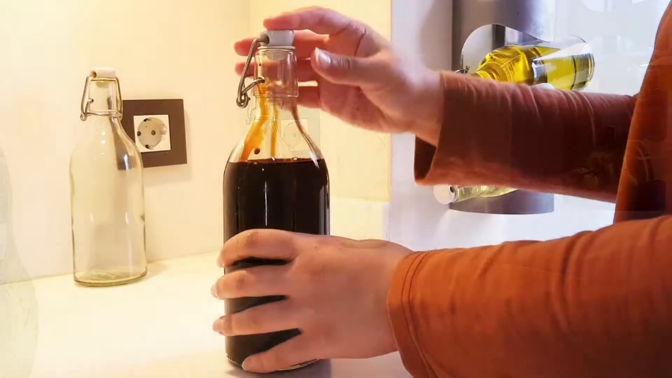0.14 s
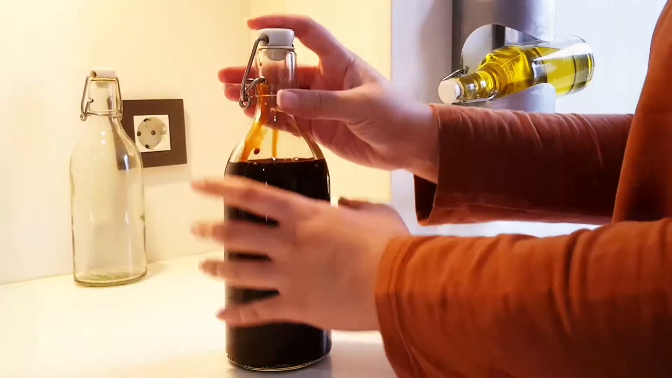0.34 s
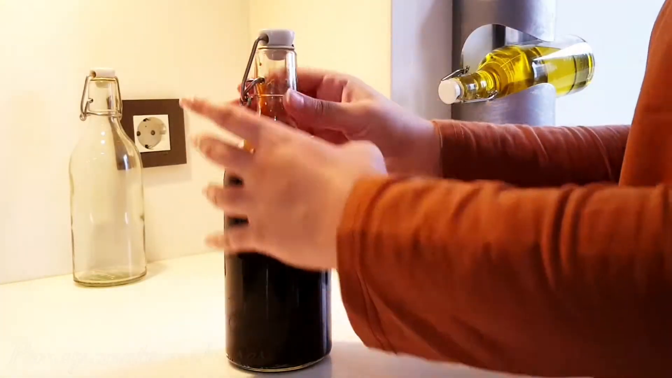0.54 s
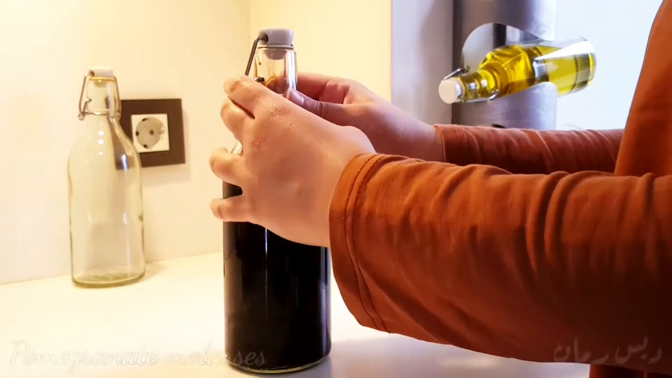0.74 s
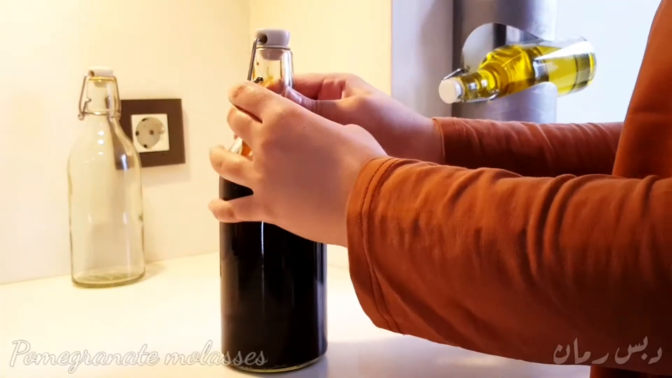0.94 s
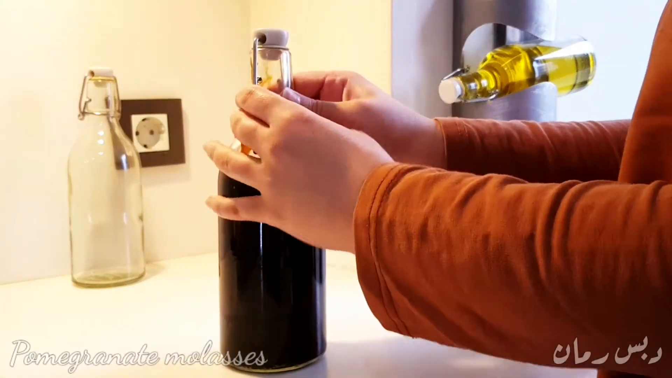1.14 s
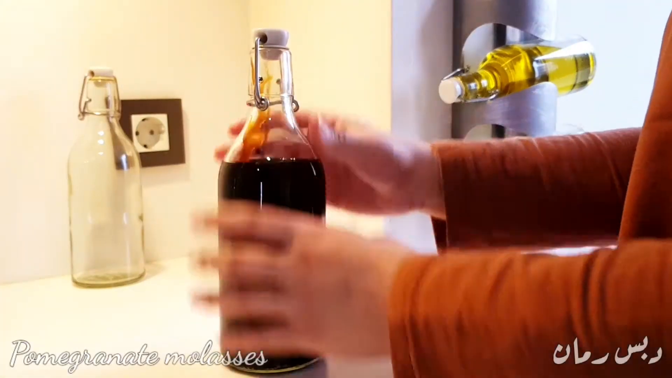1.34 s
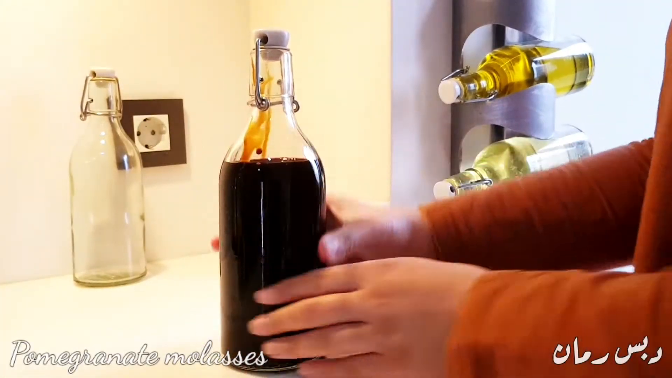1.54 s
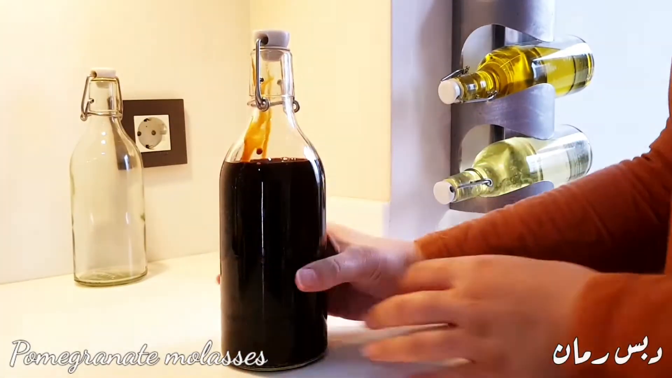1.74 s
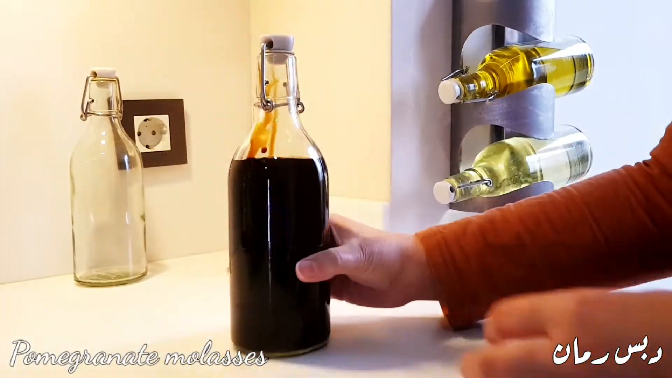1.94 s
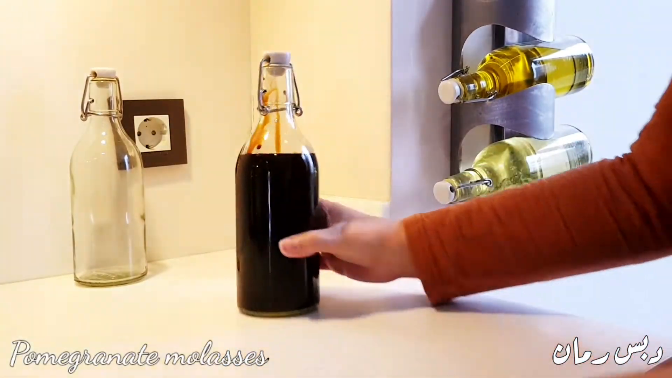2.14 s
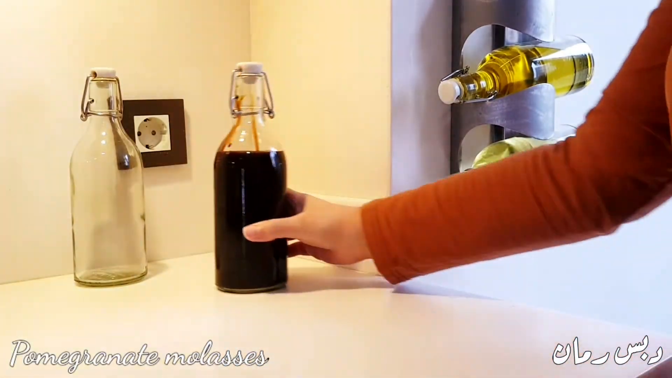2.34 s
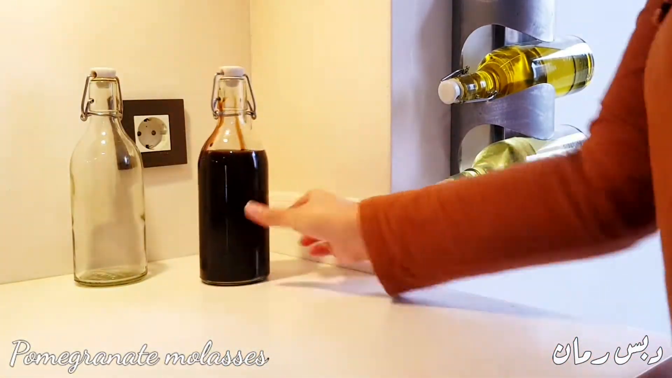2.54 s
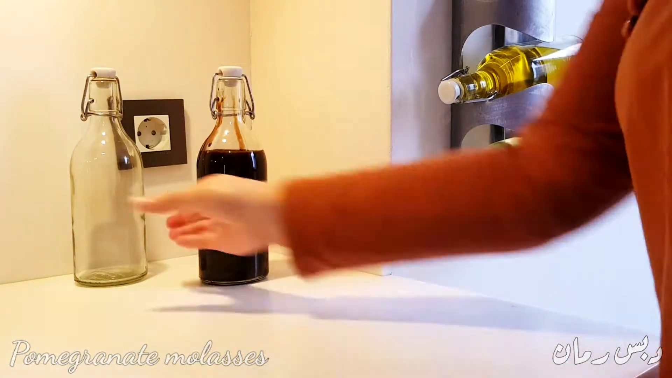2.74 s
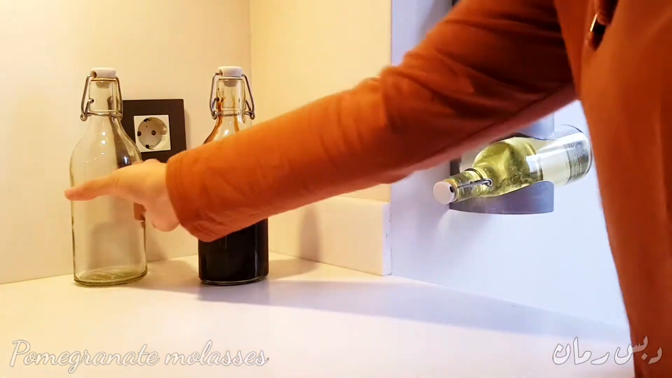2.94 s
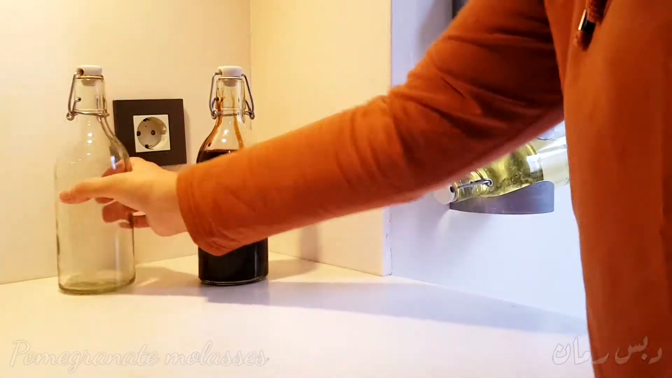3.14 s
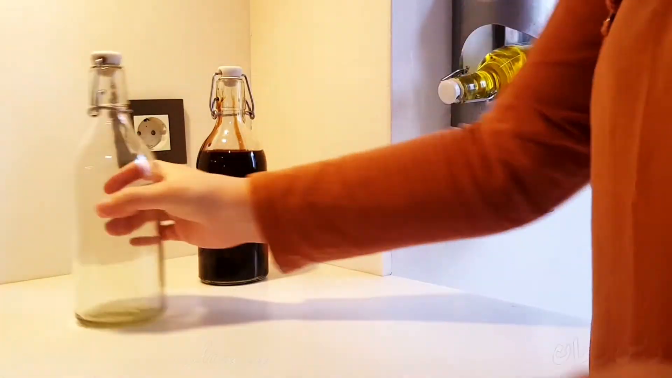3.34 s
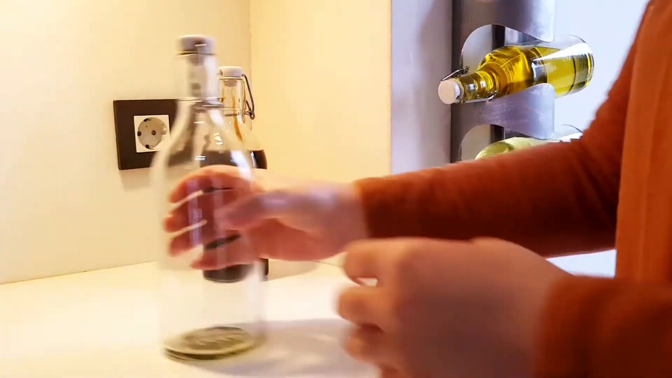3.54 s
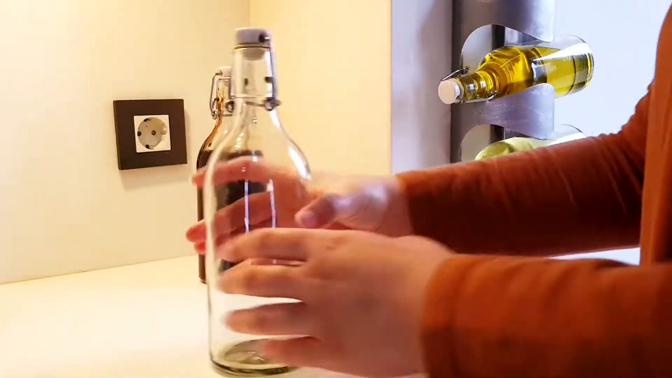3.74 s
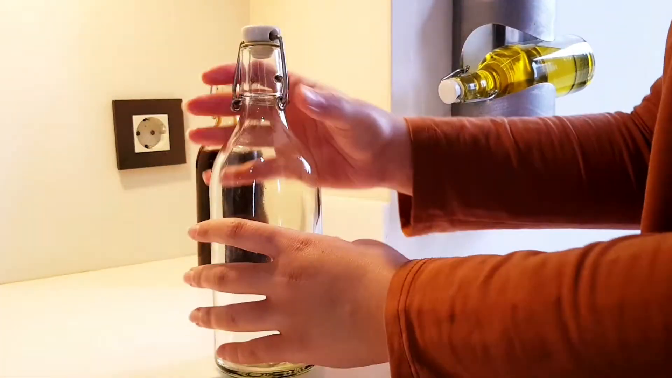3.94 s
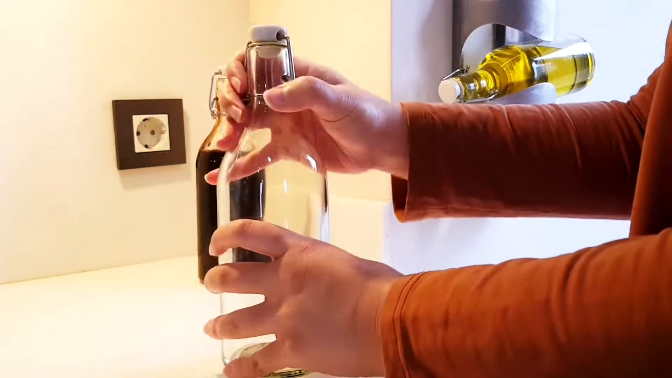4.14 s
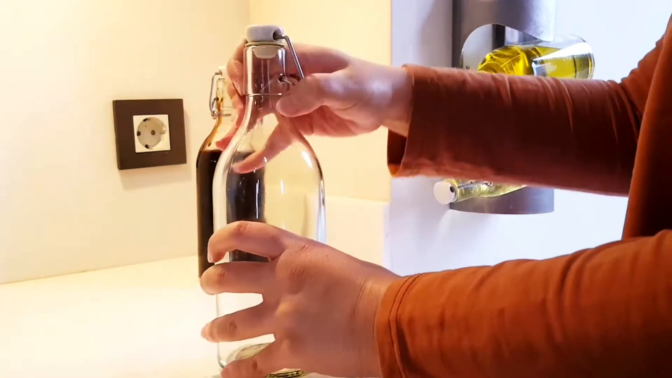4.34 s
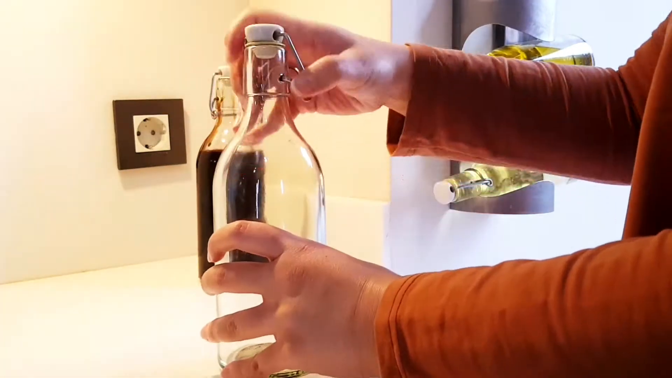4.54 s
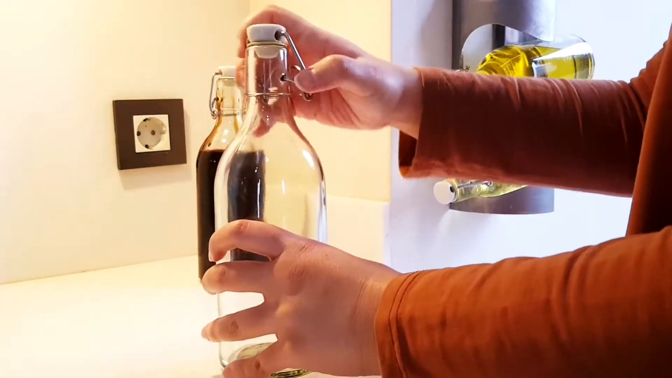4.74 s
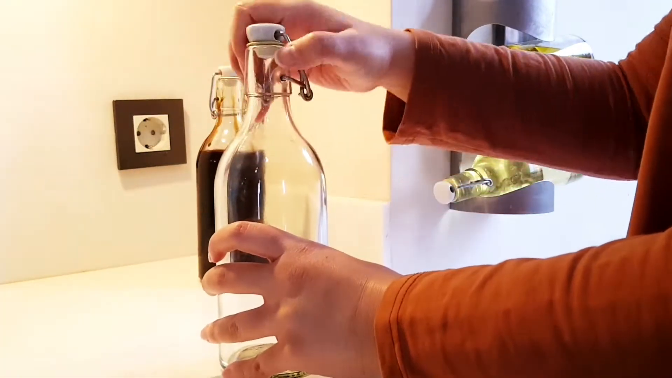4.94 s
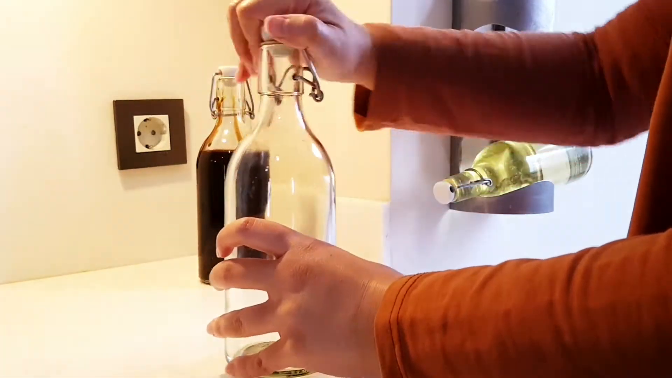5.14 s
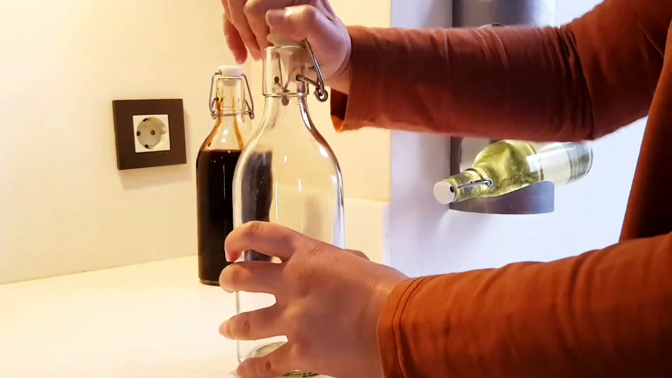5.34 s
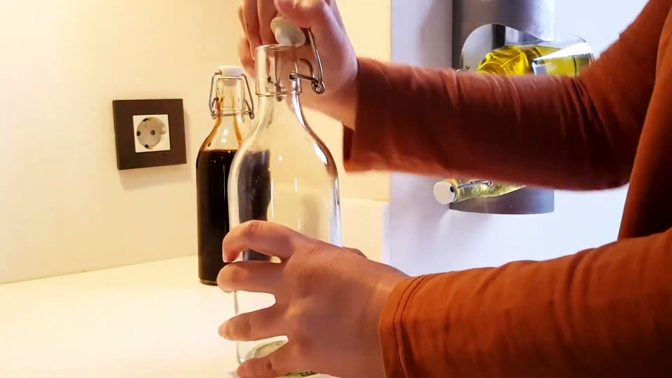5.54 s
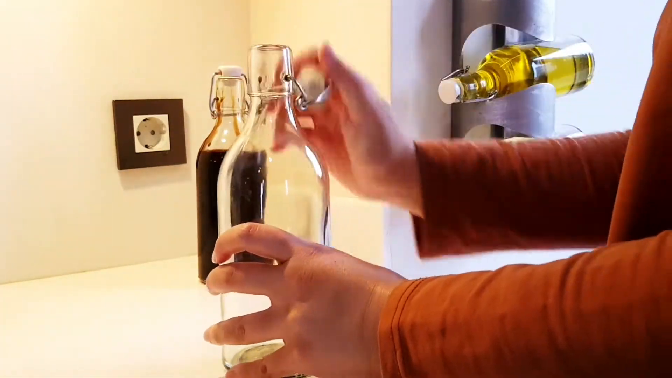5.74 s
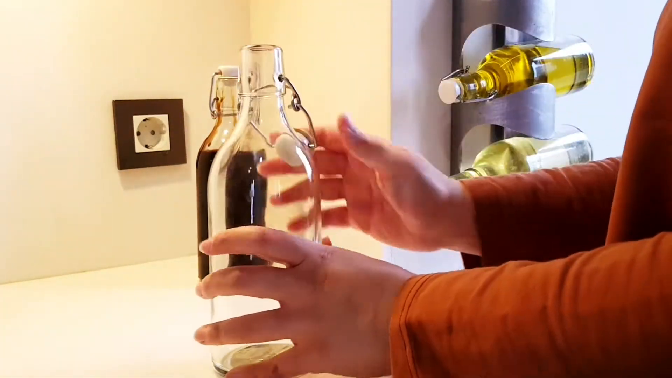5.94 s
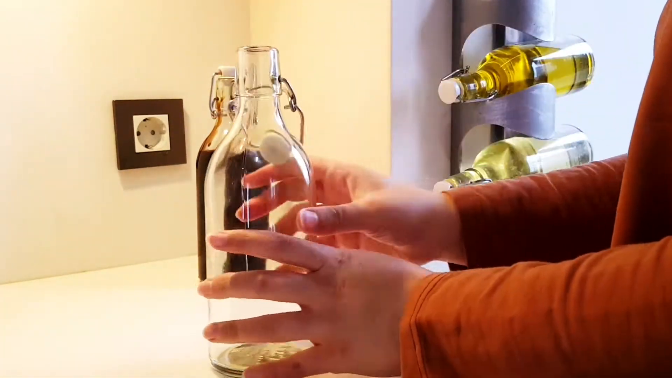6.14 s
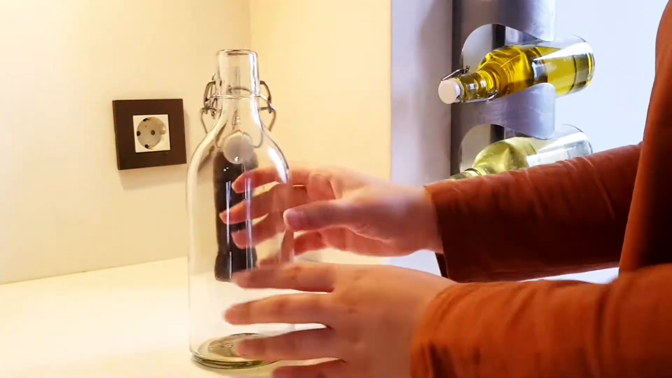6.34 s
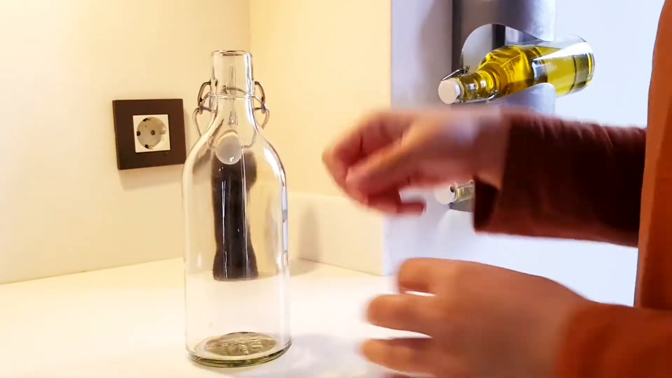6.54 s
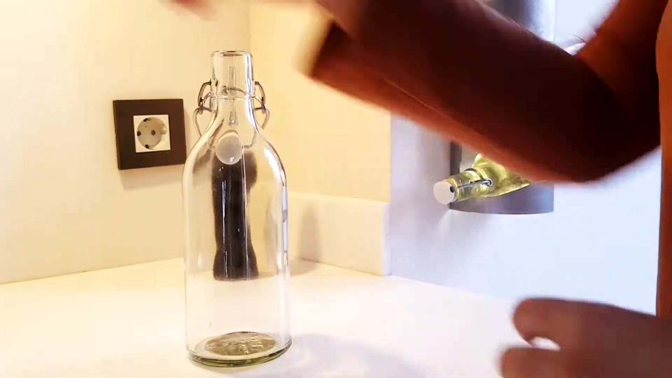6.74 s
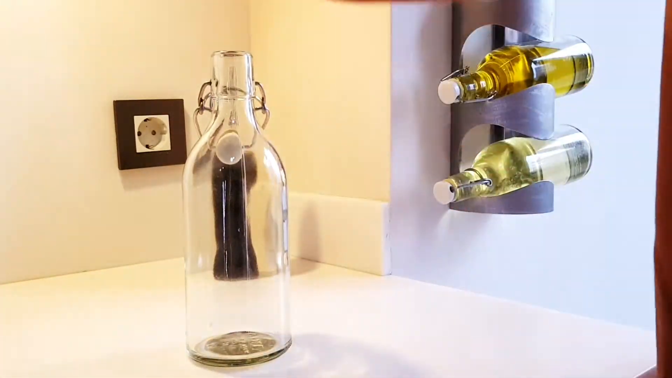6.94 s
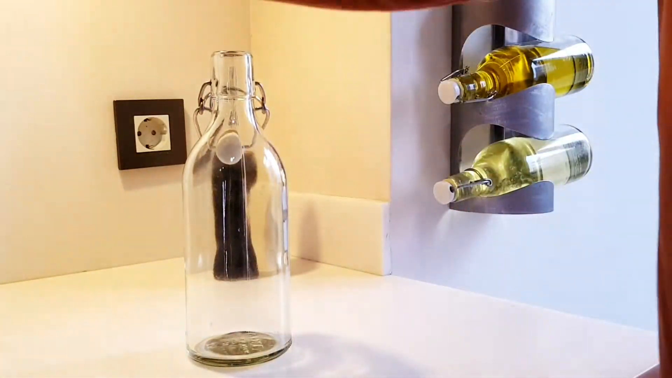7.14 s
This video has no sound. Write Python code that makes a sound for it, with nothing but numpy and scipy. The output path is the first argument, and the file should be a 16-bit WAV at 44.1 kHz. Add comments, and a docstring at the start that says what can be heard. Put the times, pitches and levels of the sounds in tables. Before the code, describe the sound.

Glass bottles with wire stoppers are worked by hand on a kitchen counter, heard close with short room reverberation. Nearly silent at first, then a sudden sharp clasp snap, a dry rough slide, the loudest cluster of woody knocks and another slide. Lighter bumps and small metallic glass clicks come irregularly, then a faint drag and quiet hum with thin hiss.

```python
"""Swing-top glass bottles are clamped, slid, rocked and set down on a hard kitchen counter.
Faint clicks of the wire clasp come first, then a hard knock with sharp clicks and a slide of a full bottle.
A burst of knocks near 3 s leads into a slide of an empty one; knocks and clicks follow, then a last slide.
Knocks are short pulses over decaying worktop modes, clicks are impulses spread over milliseconds with
decaying glass modes added, slides are resonant noise; a small tiled room answers over hum and treble noise."""
import sys
import numpy as np
from scipy import signal
from scipy.fft import irfft
from scipy.io import wavfile
from scipy.ndimage import uniform_filter1d

SR = 44100
rng = np.random.default_rng(int(sys.argv[2]) if len(sys.argv) > 2 else 0)


def dump(signal):
    """Clip the signal to [-1, 1] and save it as 16-bit WAV at the path in sys.argv[1]."""
    limited = np.clip(np.atleast_2d(signal).T, -1, 1)
    pcm = np.round(limited * 32767).astype(np.int16)
    wavfile.write(sys.argv[1], SR, pcm)


N = 320607

# modes of the worktop and cabinet: hz, relative level_db, t60_s
WORKTOP_MODES = [(81, -2, .3), (125, 3.5, 0.16), (146, -1.5, 0.13), (187.3, -3.5, 0.096), (212, -7, 0.099),
                 (248.4, -3, 0.11), (290.7, -0.5, .13), (354.6, 4, 0.079), (407.4, -1, 0.052),
                 (528.6, 3, 0.069), (612.5, -11, 0.23), (734, -33, .06), (867, -10, 0.053), (886, -7, 0.15),
                 (989, -21, .05), (1121, -2, 0.029), (1328, 0, 0.026), (1523, 6, 0.021), (1880, -3, 0.036)]
# modes of empty glass and wire, with a close pair that beats: hz, struck_db, rubbed_db, t60_s
GLASS_MODES = [(2710, -3, -40, .05), (3715, -2, 1, .2), (3763, -1, 1, .4), (5750, 0, -30, .14),
               (6250, -14, -14, .15), (8120, -3, -16, .08), (8460, -6, -20, .12), (9180, -20, -13, .2),
               (10000, -8, -22, .1), (12400, -6, -30, .07), (13480, -20, -5, .1), (13980, -20, -3, .12),
               (15200, 0, -30, .07)]


def gain_of(db):
    """Level to amplitude: 20 dB is a factor of ten."""
    return 10 ** (np.asarray(db) / 20)


def evened(x):
    """Normalization: scales a signal or field to rms 1."""
    return x / np.sqrt(np.mean(x ** 2) + 1e-20)


def read(points, hz):
    """Spectral interpolation: reads a table along a logarithmic frequency axis."""
    point_hz, value = np.transpose(points)
    return np.interp(np.log(hz + 1), np.log(point_hz + 1), value)


def add(mix, start_s, sound, pan_db=0):
    """Level-difference stereo: adds a sound, pan_db stronger on the left."""
    part = mix[:, round(start_s * SR):][:, :sound.shape[-1]]
    sides = gain_of([[pan_db / 2], [-pan_db / 2]])
    part += (sound * sides)[:, :part.shape[1]]


def noise(length, shape, size=512, likeness=None):
    """Partly coherent stereo noise; shape(hz, s) gives each cell's gain, likeness a floor of coherence."""
    # left-right likeness of diffuse sound, highest in the bass: hz, correlation
    diffuse_likeness = [(60, 0.94), (130, 0.99), (290, 0.92), (640, 0.47), (1410, -0.25), (3100, 0.24),
                        (6820, -0.21), (15000, -0.03)]
    hop = size // 4
    frames, hz = length // hop + 5, np.fft.rfftfreq(size, 1 / SR)
    a, b, c, d = rng.standard_normal((frames, len(hz), 4)).T
    same = read(diffuse_likeness, hz)
    if likeness is not None:
        same = np.maximum(likeness, same)
    same = np.clip(same, -1, 1)[:, None]
    left, other = a + 1j * b, c + 1j * d
    right = same * left + np.sqrt(1 - same ** 2) * other
    cells = np.array([left, right]) * shape(hz[:, None], np.arange(frames) * hop / SR)
    return signal.istft(cells, nperseg=size, noverlap=size - hop)[1][:, :length]


def peaks(table, hz):
    """Resonance: adds the power responses of modes given as hz, width_hz, level_db."""
    return np.sqrt(sum(gain_of(db) ** 2 / (1 + (2 * (hz - f) / width) ** 2) for f, width, db in table))


def patches(hz, s, db, tall=6, wide=12):
    """Random modulation: level blotches of rms db, smoothed over tall bins and wide frames."""
    field = rng.standard_normal((len(s), len(hz))).T
    field = uniform_filter1d(field, int(tall), 0)
    field = uniform_filter1d(field, int(wide), 1)
    return gain_of(db * evened(field))


def knock(tap_db, hz, ring_db, weight_db, thud_db, front):
    """Impact: a base gives a tap of a few cycles and excites the modes of the worktop."""
    # opposite-sign answer to taps at the front: delay_s, level_db
    rebound = (0.001687, -7)
    rebound_s, rebound_db = rebound
    t = np.arange(SR // 2) / SR
    # the crisp edge is weaker in duller taps: -18 dB at 1 kHz, 7 dB per octave of tap pitch
    crisp_db = tap_db - 18 + 7 * np.log2(hz / 1e3)
    tap = pulse(t, tap_db, hz, 0.18) + pulse(t, crisp_db, 2540, 0.47)
    if front:
        tap = tap - gain_of(rebound_db) * np.roll(tap, round(rebound_s * SR))
    return tap + thump(1.38 * hz, ring_db, weight_db, thud_db, 0.0011)


def pulse(t, db, hz, cycles):
    """Damped oscillation: a sine under a cubic rise and an exponential decay."""
    u = t * hz / cycles
    envelope = (u / 3) ** 3 * np.exp(3 - u)  # reaches 1 at u = 3
    return gain_of(db) * envelope * np.sin(2 * np.pi * hz * t)


def thump(top_hz, ring_db, weight_db, thud_db, rise_s):
    """Modal excitation: the struck spot sets each worktop mode's level, here drawn by chance."""
    t = np.arange(SR // 2) / SR
    f, mode_db, t60 = np.transpose(WORKTOP_MODES)[:, :, None]
    spot_db = 3 * rng.standard_normal(f.shape)
    phase = 2 * np.pi * rng.random(f.shape)
    blow_db = np.select([f < 100, f < 180], [thud_db, weight_db], ring_db)
    blow_db = blow_db - 10 * np.log10(1 + (f / top_hz) ** 4)  # soft blows miss high modes
    decay = gain_of(mode_db + spot_db + blow_db - 60 * t / t60)
    modes = decay * np.sin(2 * np.pi * f * t + phase)
    return modes.sum(0) * (1 - np.exp(-t / rise_s)) ** 2


def click(db, hz, rattle_s, ring_db):
    """Dispersion: random delay of each frequency band spreads a click into a rattle; glass modes are added."""
    t = np.arange(SR // 2) / SR
    bins = np.fft.rfftfreq(len(t), 1 / SR)
    width_hz = 1300 + 0.53 * hz  # higher clicks are broader
    chance = rng.exponential(1, 2000)
    delay_s = .0005 + rattle_s * np.interp(bins * 2 * rattle_s, np.arange(2000), chance)
    phase = -2 * np.pi * np.cumsum(delay_s) * bins[1]  # phase is the running sum of delay
    burst = irfft(np.exp(1j * phase) / (1 + ((bins - hz) / width_hz) ** 4), len(t))
    burst[SR // 4:] = 0
    burst *= .5 * np.sqrt(rattle_s * SR / 2) / np.linalg.norm(burst)
    f, struck_db, _, t60 = np.transpose(GLASS_MODES)[:, :, None]
    near_db = -30 * abs(np.log2(f / hz))  # modes near the loudest band are struck hardest
    ring = gain_of(struck_db + near_db + ring_db - 60 * t / t60) * np.sin(2 * np.pi * f * t)
    return gain_of(db) * burst, gain_of(db) * ring.sum(0)


def slide(rise_s, glide_s, fall_s, left, scrape_db, grit_db, rumble_db, rubbed_db, body):
    """Friction: noise that grows as a power of speed shakes the bottle, worktop and glass modes."""
    # spectrum of the grit: hz, level_db per Hz
    grit_spectrum = [(880, -31), (1500, -1), (2150, -10), (2420, -9), (4230, -24.5), (5560, -32),
                     (11100, -51), (15500, -58)]
    t = np.arange(0, rise_s + glide_s + fall_s, 1 / SR)
    speed = np.interp(t, np.cumsum([0, rise_s, glide_s, fall_s]), [0, 1, left, 0])
    scrape_gain = gain_of(scrape_db) * speed ** 1.15
    grit_gain = gain_of(grit_db) * speed ** 1.94
    rumble_gain = gain_of(rumble_db) * speed ** 0.42
    top = [(f, 1.26 / t60, db) for f, db, t60 in WORKTOP_MODES if f < 500]  # fast decay, broad peak
    glass = [(f, f / 70, db) for f, _, db, _ in GLASS_MODES]

    def scrape_shape(hz, s):
        return peaks(body, hz) * patches(hz, s, 3.2, 4.1, 11)

    def grit_shape(hz, s):
        return gain_of(read(grit_spectrum, hz)) * (hz > 2500) * patches(hz, s, 4.0)

    def rumble_shape(hz, s):
        return peaks(top, hz) * patches(hz, s, 6.1, 2.8, 4.1)

    def glass_shape(hz, s):
        return peaks(glass, hz) ** 2 * patches(hz, s, 3.5, 30, 4.6)

    scrape = scrape_gain * evened(noise(len(t), scrape_shape, 1024, 0.35))
    grit = grit_gain * evened(noise(len(t), grit_shape, 256, 0.14))
    rumble = rumble_gain * evened(noise(len(t), rumble_shape, 2048))
    rubbed = grit_gain * gain_of(rubbed_db) * evened(noise(len(t), glass_shape, 2048, 0.95))
    return scrape + grit + rumble + rubbed


def room(x):
    """Reverberation: single echoes join a dense decaying tail; three tails take turns so hits differ."""
    # decay time of the room: hz, t60_s
    decay_time = [(60, 0.94), (125, 0.8), (300, .43), (700, 0.57), (1500, 0.47), (3000, 0.48), (6000, 0.5),
                  (11000, 0.37)]
    # colour of the tail: hz, level_db
    tail_colour = [(60, -7.5), (250, 1.5), (1000, 0), (3000, 5), (8000, 4), (14000, 4.5)]
    # echoes of tiles and cupboards: delay_s, level_db
    echoes = [(.0034, -14), (.0052, -13), (.0075, -13), (.012, -15), (.019, -16), (.027, -17)]

    def tail_shape(hz, s):
        return gain_of(read(tail_colour, hz) - 60 * s / read(decay_time, hz))

    out = np.zeros((2, N))
    turn = np.arange(N) / SR * 9 % 3  # nine turns a second
    for k in range(3):
        tail = noise(SR, tail_shape, 256)
        tail *= 1 - np.exp(-np.arange(SR) / SR / .009)
        tail *= gain_of(-0.5) / np.linalg.norm(tail[0])
        for delay_s, db in echoes:
            spots = round(delay_s * SR) + rng.integers(-5, 6, 2)
            tail[[0, 1], spots] += gain_of(db) * rng.choice([-1, 1])
        distance = abs((turn - k + 1.5) % 3 - 1.5)
        share = np.cos(np.pi / 2 * np.clip(distance, 0, 1))  # equal-power crossfade
        out += signal.fftconvolve((x * share)[None], tail, axes=1)[:, :N]
    return out


def background():
    """Modulated noise: a lumpy low hum of the house, a thin hiss and soft swells of treble noise."""
    # drift of the background, which fades in: time_s, hum_db, hiss_db
    drift = [(0, -52, -87), (.15, -49, -71), (.9, -41, -70.5), (1.42, -47, -72), (1.8, -45, -78),
             (2.7, -45, -70.5), (2.95, -44.5, -65.5), (3.85, -44, -63.5), (4.05, -45, -71.5),
             (4.6, -46, -73.5), (5.25, -44, -72.5), (6.0, -40.5, -68), (6.45, -44, -71.5),
             (6.9, -43.5, -65.5), (7.27, -43.5, -71)]
    # soft swells of treble noise: middle_s, half_length_s, level_db
    swells = [(.1, .2, -75.5), (1.66, 0.23, -66.5), (3.834, 0.18, -70), (4.5, 0.094, -82),
              (5.506, 0.17, -71), (6.606, 0.25, -63.5), (7.053, .12, -75)]
    # spectra of house hum, microphone hiss and treble swells: hz, level_db per Hz
    hum_spectrum = [(12, -53.5), (20, -14), (51, -4), (97, 0.5), (168, -8), (196, -8), (229, -8.5),
                    (334, -12.5), (569, -16.5), (621, -15), (679, -14), (1180, -13.5), (2250, -30.5),
                    (4000, -65.5), (5200, -64), (8800, -120)]
    hiss_spectrum = [(2500, -6.5), (4000, -2), (6500, -6.5), (10000, 0), (14000, 1.5), (15700, -2)]
    swell_spectrum = [(2000, -6.5), (3500, -5.5), (6000, -6), (10000, -7), (13000, -7), (15600, -13)]
    t = np.arange(N) / SR
    time_s, hum_db, hiss_db = np.transpose(drift)
    hum_gain = gain_of(np.interp(t, time_s, hum_db))
    hiss_gain = gain_of(np.interp(t, time_s, hiss_db))
    swell_gain = sum(gain_of(db) * np.exp(-((t - middle) / half) ** 2) for middle, half, db in swells)

    def hum_shape(hz, s):
        return gain_of(read(hum_spectrum, hz)) * patches(hz, s, 1.95, 5, 11)

    def hiss_shape(hz, s):
        return gain_of(read(hiss_spectrum, hz)) * (hz > 2000) * patches(hz, s, 0.88, 8.7, 34)

    def swell_shape(hz, s):
        return gain_of(read(swell_spectrum, hz)) * (hz > 2000) * patches(hz, s, 2.0, 12, 22)

    hum = hum_gain * evened(noise(N, hum_shape, 2048))
    hiss = hiss_gain * evened(noise(N, hiss_shape))
    treble_swells = swell_gain * evened(noise(N, swell_shape))
    return hum + hiss + treble_swells


def scene():
    """Superposition: direct sound of hits and slides, the room's answer and the background add up."""
    # bases tapping the counter: start_s, tap_db, pitch_hz, worktop ring_db,
    # weight_db (100-180 Hz), thud_db (under 100 Hz)
    base_taps = [(0.9499, -10.5, 805, -25, -44, -52), (2.531, -25, 840, -37.5, -34, -41),
                 (2.9987, -3, 1082, -27, -30.5, -51), (3.055, -10, 960, -23.5, -35, -54),
                 (3.0613, -7.5, 1120, -27.5, -33, -50), (3.0819, -14.5, 994, -28.5, -48, -51),
                 (4.008, -38, 890, -38, -40, -54), (4.019, -28, 590, -39.5, -43, -44),
                 (4.063, -38.5, 450, -34, -34.5, -35.5), (4.254, -27, 410, -34.5, -22.5, -27),
                 (4.298, -11.5, 950, -27.5, -30, -27.5), (4.717, -22.5, 600, -30, -35, -54),
                 (4.815, -18.5, 850, -31, -29, -54), (5.022, -37, 700, -38, -36, -52),
                 (5.323, -18.5, 802, -29, -26, -33), (5.614, -10.5, 944, -25.5, -35, -50),
                 (5.743, -18, 790, -28, -31.5, -32.5), (5.826, -31, 796, -47, -37.5, -38),
                 (6.145, -38, 453, -36, -44, -48)]
    # soft pushes with no tap: start_s, top_hz of the ring, ring_db, weight_db, thud_db, rise_s
    pushes = [(0.951, 260, -22.5, -22.5, -28, 0.0017), (1.845, 300, -33.5, -42, -57, .006),
              (2.272, 400, -39, -37, -50, 0.0043), (3.115, 400, -26, -30, -48, 0.007),
              (3.738, 350, -37, -39, -48.5, 0.0043), (5.303, 400, -42, -30, -47, 0.0027),
              (6.003, 425, -30, -25, -48, 0.011), (6.014, 910, -28, -28, -52, .005)]
    # wire clasp and fingers on it: start_s, level_db, loudest band_hz, rattle_s, glass ring_db
    # relative to the click, left-right pan_db
    clasp_clicks = [(.164, -47.5, 11800, 0.0046, -26, -1), (.18, -50, 5500, .0021, -26, 14),
                    (.640, -55.5, 7840, .029, -29, 9), (0.9479, -9.5, 12100, .0036, -61, 7),
                    (0.948, -8, 1500, 0.0023, -63.5, 1), (0.9477, -19, 4570, 0.0041, -60, -0.5),
                    (1.754, -52, 4900, .012, -16, -14), (3.000, -38.5, 4100, 0.0021, -25, 11),
                    (3.055, -43, 3700, .004, -10, 0), (4.252, -39.5, 8150, .0029, -11, 8.5),
                    (4.393, -44, 10900, 0.0022, -28.5, 7.5), (5.302, -45, 8100, 0.0058, -12.5, 9.5),
                    (5.469, -50.5, 5720, .0022, -6.5, 14), (5.55, -47.5, 5750, 0.0062, -14, -3),
                    (5.720, -54, 9450, 0.0038, -23.5, 10), (5.745, -36.5, 12500, 0.0059, -9, 5),
                    (5.755, -31, 3380, 0.0018, -4, 10), (5.758, -38, 14400, 0.006, -7, 11),
                    (5.812, -28.5, 2820, 0.0017, -7, 3), (5.812, -45, 6260, 0.0031, -4, 3),
                    (6.948, -48, 5350, .0045, -30, 6)]
    # slides: start_s, rise_s, glide_s, fall_s of speed, share of speed left after gliding, scrape_db,
    # grit_db (above 2.5 kHz), worktop rumble_db, rubbed_db of the glass against the grit
    slide_moves = [(1.76, 0.36, .36, 0.066, 0.41, -33.5, -48.5, -43, -40),
                   (3.06, 0.17, 0.37, .17, 1, -36, -52.5, -41.5, -3.5),
                   (6.03, 0.27, .07, .14, 0.66, -41.5, -78, -45.5, 10)]
    # scrape resonances of the full and the empty bottle: hz, width_hz, level_db
    full_body = [(776, 200, -0.5), (1110, 180, 1.5), (1516, 160, 3), (1910, 160, 0), (2420, 260, -7.5),
                 (4300, 230, -19)]
    empty_body = [(564, 48, 9.5), (830, 170, 1.5), (1270, 150, 2), (1710, 260, -1), (2240, 170, -28)]
    front_from_s = 3.9  # the empty bottle stands at the front from here on
    back_pan_db, front_pan_db = 1.5, 1.4

    hits, rings, slides = np.zeros((3, 2, N))
    for start_s, *blow in base_taps:
        front = start_s > front_from_s
        add(hits, start_s, knock(*blow, front), front_pan_db if front else back_pan_db)
    for start_s, *push in pushes:
        add(hits, start_s, thump(*push), front_pan_db if start_s > front_from_s else back_pan_db)
    for start_s, *strike, pan_db in clasp_clicks:
        burst, ring = click(*strike)
        add(hits, start_s, burst, pan_db)
        add(rings, start_s, ring, pan_db)
    for (start_s, *motion), body in zip(slide_moves, [full_body, empty_body, empty_body]):
        add(slides, start_s, slide(*motion, body), 1.0)
    direct = hits + rings + slides
    direct[1] = np.roll(direct[1], 4)  # samples: the right microphone is a little further away
    # the ring of the glass stirs the room only weakly
    sent = hits + gain_of(-9) * rings + gain_of(-3.5) * slides
    return direct + room(sent.mean(0)) + background()


def record(dry):
    """Band limitation: a low-pass at 15550 Hz follows a slightly stronger left microphone."""
    pair = dry * gain_of([[.5], [-.51]])
    low_pass = signal.firwin(511, 15550, window=("kaiser", 9), fs=SR)
    return signal.oaconvolve(pair, low_pass[None], "same")


dry = scene()
out = record(dry)
dump(out)
```